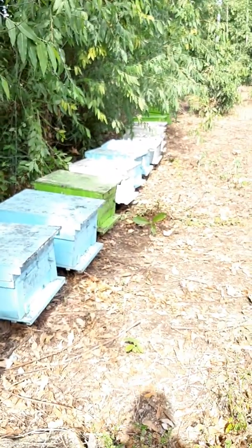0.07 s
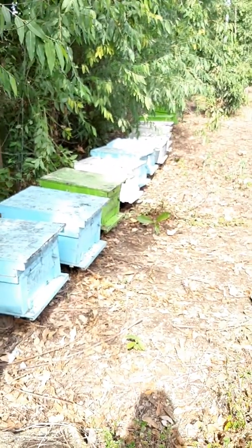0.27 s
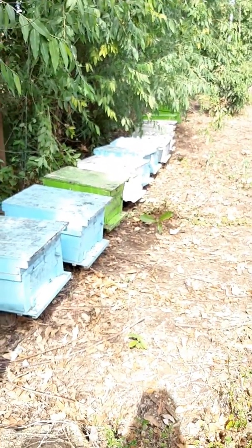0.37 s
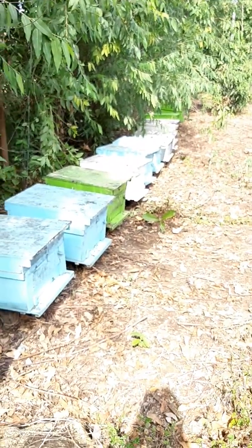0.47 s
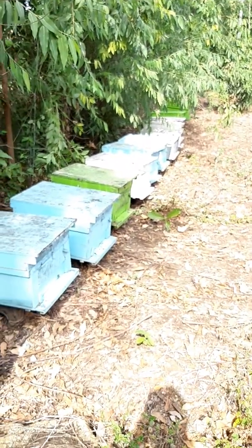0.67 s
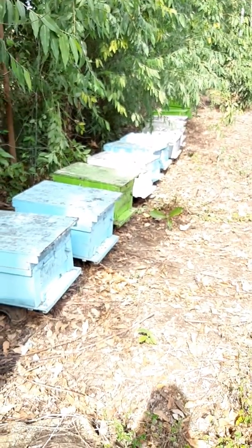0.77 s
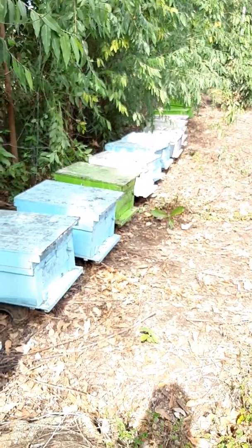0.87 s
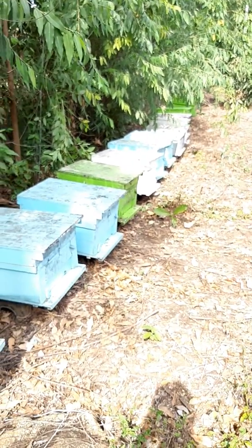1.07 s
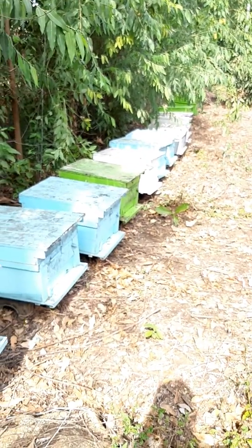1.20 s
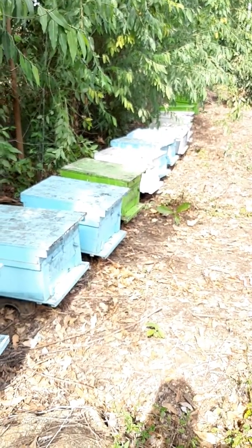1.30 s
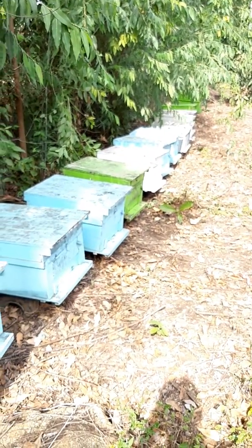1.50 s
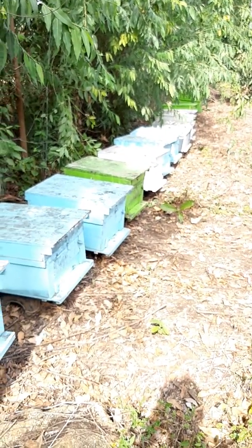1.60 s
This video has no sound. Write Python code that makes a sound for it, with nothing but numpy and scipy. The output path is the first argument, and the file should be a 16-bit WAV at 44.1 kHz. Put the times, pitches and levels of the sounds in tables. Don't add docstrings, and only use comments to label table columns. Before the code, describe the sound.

A shoe scuffs dry leaf litter with a brief squeak and hollow knock, bees humming faintly

```python
import sys
import numpy as np
from scipy import signal
from scipy.fft import rfft, irfft
from scipy.io import wavfile
from scipy.ndimage import uniform_filter1d

SR = 44100
rng = np.random.default_rng(int(sys.argv[2]) if len(sys.argv) > 2 else 0)


def bounce(signal):
    frames = np.transpose(np.atleast_2d(signal))
    limited = np.clip(frames, -1, 1)
    pcm = np.round(limited * 32767).astype(np.int16)
    wavfile.write(sys.argv[1], SR, pcm)


def rack_gain(trim_db):
    fader = np.asarray(trim_db, float)
    return 10 ** (fader / 20)


N = 72765
LAG_S = 0.0002737


def curve(table, hz):
    table = np.array(table, float)
    return np.interp(np.log(np.maximum(hz, 1)), np.log(table[:, 0]), table[:, 1])


def level(x, db):
    return x * rack_gain(db) / np.sqrt(np.mean(x ** 2))


def shape(x, gain):
    return irfft(rfft(x) * gain(np.fft.rfftfreq(N, 1 / SR)), N)


def ports(x, other=0, alike=((1, 1), (2, 1)), lag=LAG_S):
    def likeness(hz):
        return np.clip(curve(alike, hz), 0, 1)

    same = shape(x, lambda hz: np.sqrt((1 + likeness(hz)) / 2))
    odd = shape(x * 0 + other, lambda hz: np.sqrt((1 - likeness(hz)) / 2))
    left = shape(same + odd, lambda hz: np.exp(-2j * np.pi * hz * lag / 2))
    right = shape(same - odd, lambda hz: np.exp(2j * np.pi * hz * lag / 2))
    return np.array([left, right])


def walk(rate):
    k = int(SR / rate)
    steps = np.repeat(rng.standard_normal(N // k + 1), k)
    return 1.3 * uniform_filter1d(uniform_filter1d(steps, k), k)[:N]


def grit(table, share):
    grains_per_s, grain_spread_db = 3500, 2.5
    struck = rng.random(N) < grains_per_s / SR
    clicks = struck * rng.standard_normal(N) * rack_gain(grain_spread_db * rng.exponential(size=N))
    share = np.clip(share, 0, 1)
    raw = np.sqrt(share) * level(clicks, 0) + np.sqrt(1 - share) * rng.standard_normal(N)
    return level(shape(raw, lambda hz: rack_gain(curve(table, hz))), 0)


def leaves(t):
    # f/Hz, density/dB
    leaf_tone = [(1500, -2), (2400, -10), (3600, -0.5), (5000, -1), (6300, -5.5), (7050, 0.5), (8300, -12),
                 (16000, -11)]
    # f/Hz, density/dB
    murmur_tone = [(40, -8), (100, -6.5), (300, -2.5), (600, -3), (1000, -13), (1600, -11), (2300, -17.5),
                   (5000, -41)]
    # f/Hz, likeness/1
    alike_far = [(60, 0.58), (300, 0.71), (1500, 0.39), (4000, 0.24), (12000, 0.19)]
    hiss_db, breeze_db_per_s, murmur_db, flutter_db = -64, 2.5, -61.5, 0.5

    def one():
        flutter = rack_gain(flutter_db * walk(13.55))
        hiss = rack_gain(hiss_db + breeze_db_per_s * t) * grit(leaf_tone, 0.076)
        murmur = rack_gain(murmur_db) * grit(murmur_tone, 0)
        return flutter * (hiss + murmur)

    return ports(one(), one(), alike_far)


def bee(hz, gain, bass_db=0):
    # multiple/1, level/dB
    wing = [(1, -9), (2, -1.5), (3, -23.5), (4, -8.5), (5, -14.5), (6, -12), (7, -13), (8, -36)]
    throb_db, throbs_per_s, jitter, lag_spread_s = 2.5, 28, 0.01, 0.00016
    turn = np.exp(2j * np.pi * np.cumsum(hz * (1 + jitter * walk(39.99))) / SR)
    tone = 0
    for k, db in wing[::-1]:
        start = np.exp(2j * np.pi * rng.random())
        tone = (tone + rack_gain(db + bass_db * (k < 1.5)) * start) * turn
    tone = gain * rack_gain(throb_db * walk(throbs_per_s)) * tone.imag
    late = int(SR * (LAG_S + lag_spread_s * rng.standard_normal()))
    return np.array([np.roll(tone, late), tone])


def swarm(t):
    # middle t/s, length/s, level/dB, wing f/Hz, sag/(Hz/s)
    near = [
        (0.441, .2, -65.5, 213, 39.5),
        (0.692, .16, -62, 195, 100),
        (.665, .1, -66, 241.4, 0),
        (.925, .15, -62.5, 193.8, 320),
        (1.091, 0.25, -65.5, 216.2, 29.5),
        (1.129, 0.29, -62, 196.8, -30),
        (1.248, 0.13, -58, 205, 20),
        (1.332, .2, -64.5, 225.3, 30.5),
        (1.351, .12, -61, 196.7, -40),
        (1.577, 0.24, -67, 227.4, -0.5),
    ]
    bees, wing_hz, spread, wander = 20, 224, 0.19, 0.02
    passing_db, swarm_db, near_bass_db = 3, -58.5, 5.5
    cloud = 0
    for p in np.linspace(-1, 1, bees):
        rate = wing_hz * (1 + spread * (p + p ** 3) / 2 + wander * walk(7.4))
        cloud = cloud + bee(rate, rack_gain(passing_db * walk(6.14)))
    flybys = 0
    for s, long, db, hz, sag in near:
        rate = hz - sag * np.clip(t - s, -long, long)
        swell = rack_gain(db) * np.exp(-(2 * (t - s) / long) ** 4)
        flybys = flybys + bee(rate, swell, near_bass_db)
    return level(cloud, swarm_db) + flybys


def litter(t):
    # t/s, peak level/dB, centre f/Hz, width/Hz
    ticks = [(.009, -44, 4470, 2500), (.0255, -46, 12300, 2500), (.027, -48, 7500, 1500),
             (.0355, -45.5, 4200, 3000), (.0435, -51, 13000, 4000), (.0755, -43, 6000, 3000),
             (.076, -36.5, 12800, 3000), (.0778, -35, 3400, 3000), (.084, -39, 11500, 7000),
             (.091, -46, 9500, 4000), (.1855, -31, 4000, 3000), (.4062, -46, 10000, 7100),
             (.4105, -52, 4200, 2000), (.4152, -40, 11500, 8000), (.423, -53, 12900, 5000),
             (.44, -50, 11500, 7000), (.46, -47, 4450, 5260), (.46, -51, 14000, 4000),
             (.468, -51, 13000, 2040), (.4775, -49, 14300, 3000), (.478, -53, 7000, 2000),
             (.488, -50, 4400, 1500), (.499, -48.5, 12800, 5000), (.4985, -52, 7500, 2000),
             (.584, -50, 4000, 1500), (.6035, -48, 12800, 4500), (.6935, -47, 4700, 1500),
             (.6935, -44, 6800, 2800), (.694, -49, 13200, 4000), (.699, -51, 5500, 3000),
             (.7855, -49, 6000, 4970), (.946, -54, 8000, 4000), (1.18, -50, 4300, 3000),
             (1.249, -52, 13500, 5000), (1.26, -51, 14000, 4000)]
    # f/Hz, density/dB
    rustle_tone = [(1000, -9.5), (1700, 2), (2400, -2.5), (3300, -1.5), (5000, 2), (9000, -8.5),
                   (12000, -7.5), (16000, -7)]
    # f/Hz, likeness/1
    alike_litter = [(1000, .8), (8000, .65)]
    tick_decay_s, rustle_db, rustle_db_per_s = 0.001, -52.5, -18.5

    def one():
        out = rack_gain(rustle_db + rustle_db_per_s * t + 0.83 * walk(22.8)) * grit(rustle_tone, 0.44)
        noise = rng.standard_normal(N)
        for s, db, hz, width in ticks:
            burst = noise * (t > s) * np.exp(-np.maximum(t - s, 0) / tick_decay_s)
            tick = shape(burst, lambda f: np.exp(-((f - hz) / width) ** 2 * 2))
            out = out + rack_gain(db) * tick / np.abs(tick).max()
        return out

    return ports(one(), one(), alike_litter)


def clumps(x):
    clump_db, clumps_per_s = 3, 86.6
    out = 0
    for c in 100 * 2 ** (np.arange(23) / 3):
        band = shape(x, lambda hz: np.clip(1 - 3 * np.abs(np.log2(hz / c + 1e-9)), 0, 1))
        out = out + rack_gain(clump_db * walk(clumps_per_s)) * band
    return out


def squeak(t):
    start_s, length_s, start_hz, sag_hz_per_s = 0.2325, 0.034, 1582, 500
    start_db, fade_db, wobble_db = -26, -7, 1
    u = np.clip((t - start_s) / length_s, 0, 1)
    hz = start_hz - sag_hz_per_s * (t - start_s) + 8 * walk(83.0)
    loud = rack_gain(start_db + fade_db * u + wobble_db * walk(113.0)) * np.sin(np.pi * u ** 1.2) ** 0.23
    return ports(loud * np.sin(2 * np.pi * np.cumsum(hz) / SR), lag=0.0002)


def scuff(t):
    # t/s, speed as hiss level/dB, pressure as rumble level/dB
    stroke = [
        (0.052, -68.5, -72),
        (0.074, -54.5, -54.5),
        (0.121, -48.5, -46),
        (.176, -42, -48.5),
        (0.204, -29.5, -40.5),
        (0.226, -32.5, -37),
        (0.258, -32.5, -40),
        (.268, -44, -34.5),
        (0.312, -66.5, -66),
    ]
    # f/Hz, density/dB
    hiss_tone = [(500, -38), (900, -0.5), (2000, 1), (3400, -2.5), (4600, -1.5), (7300, -3.5), (9500, -6),
                 (16000, -11.5)]
    # f/Hz, density/dB
    rumble_tone = [(70, -16), (130, 4.5), (320, 2), (600, -1.5), (1400, -1), (3000, -2), (3900, -15),
                   (5000, -34)]
    # f/Hz, gain/dB
    scuff_colour = [(1700, 0), (2500, -3), (3500, 2), (5100, 3), (5750, -7), (6600, 3), (8000, 2), (9000, -5)]
    # f/Hz, likeness/1
    alike_near = [(100, .99), (800, 0.73), (1700, 0.64), (3000, 0), (5000, 0.2), (12000, 0)]
    hollow_hz, upper_hz, hz_per_db, width_hz = 4750, 7390, 55, 480
    hollow_db, upper_db, hollow_follows = -36, -7.5, 0.72
    s, speed, press = np.array(stroke).T
    on = (t > s[0]) & (t < s[-1])
    fast = np.interp(t, s, speed - speed.max())

    def whistle(f, slide):
        a, b = (shape(rng.standard_normal(N), lambda hz: np.exp(-(hz / width_hz) ** 2)) for _ in range(2))
        turn = np.exp(2j * np.pi * np.cumsum(f + hz_per_db * fast * slide) / SR)
        return ((a + 1j * b) * turn).real

    def one():
        both = whistle(hollow_hz, 1) + rack_gain(upper_db) * whistle(upper_hz, 0.3)
        hollow = rack_gain(hollow_follows * fast) * level(both, hollow_db)
        hiss = rack_gain(fast + speed.max()) * grit(hiss_tone, 0.4)
        rumble = rack_gain(np.interp(t, s, press)) * grit(rumble_tone, 0.082)
        return on * (hiss + rumble + hollow)

    def coloured(x):
        return shape(x, lambda f: rack_gain(curve(scuff_colour, f)))

    return ports(coloured(clumps(one())), coloured(one()), alike_near) + squeak(t)


def knock(t):
    # t/s, strength/dB
    knocks = [
        (.2632, -.5),
        (.27, -6),
        (.4928, -36),
    ]
    # f/Hz, level/dB, t60/s, sign/1
    body = [(125, -11.2, .036, -1), (196.7, -7.1, .0227, 1), (357.3, -11.2, .074, 1),
            (455.1, -15, .0435, -1), (524, -29, .093, 1), (630, -19.6, .019, -1), (900, -25, .024, 1)]
    # t/s, peak level/dB, f/Hz, swell time/s
    bumps = [(.085, -60, 63, 0.0083), (.106, -46, 318, .0085), (.11, -50.5, 116, .01),
             (.12, -49.5, 559, 0.0098), (.125, -47, 890, 0.0075), (.165, -42, 450, 0.01),
             (.14, -51, 198, .012), (.335, -56.5, 283, 0.0073), (.2172, -22, 126, 0.0064),
             (.217, -35.5, 850, 0.0059), (0.2376, -31.5, 157, 0.003), (.266, -35, 81.48, .0065),
             (.279, -43, 275, 0.0093), (0.2869, -32.5, 147.5, 0.0078), (0.3077, -46.5, 160, 0.019),
             (.42, -48.5, 420, .005), (.491, -47, 151, 0.0049), (0.41, -58, 670, 0.0035),
             (.503, -52, 300, 0.004), (.512, -54, 230, .006), (.697, -51.5, 960, .003),
             (1.19, -63.5, 89.5, 0.017), (1.626, -51, 462, .006), (1.642, -48.5, 95, 0.0081)]
    push_s = 0.0009
    push = sum(rack_gain(db) * np.sin(np.pi * np.clip((t - s) / push_s, 0, 1)) ** 2 for s, db in knocks)
    push = push * 2 / (push_s * SR)
    ring = 0
    for hz, db, t60, sign in body:
        ring = ring + sign * rack_gain(db) * np.exp(-np.log(1000) * t / t60) * np.cos(2 * np.pi * hz * t)
    out = signal.fftconvolve(push, ring)[:N]
    for s, db, hz, swell in bumps:
        u = np.maximum(t - s, 0) / swell
        out = out - rack_gain(db) * u ** 2 * np.exp(2 * (1 - u)) * np.sin(2 * np.pi * hz * u * swell)
    return ports(out)


def scene():
    t = np.arange(N) / SR
    return leaves(t) + swarm(t) + litter(t) + scuff(t) + knock(t)


def top_cut(x):
    return signal.sosfilt(signal.butter(12, 16740, fs=SR, output="sos"), x)


def record(dry):
    # f/Hz, left minus right/dB
    tilt = [(60, 1.3), (400, 1), (1200, 1.2), (2000, 1), (3000, -1.6), (5000, -3), (8000, -2.1),
            (14000, -4)]
    low_hz, top_hz = 54, 15780

    def edge(hz):
        return (hz < top_hz) * hz ** 4 / (hz ** 4 + low_hz ** 4)

    left, right = (shape(ch, lambda hz: edge(hz) * rack_gain(way * curve(tilt, hz) / 2))
                   for ch, way in zip(dry, (1, -1)))
    return top_cut(np.array([left, right]))


dry = scene()
out = record(dry)
bounce(out)
```